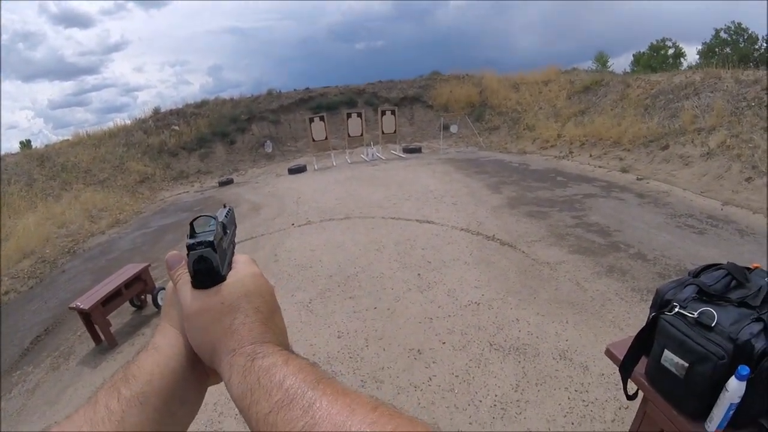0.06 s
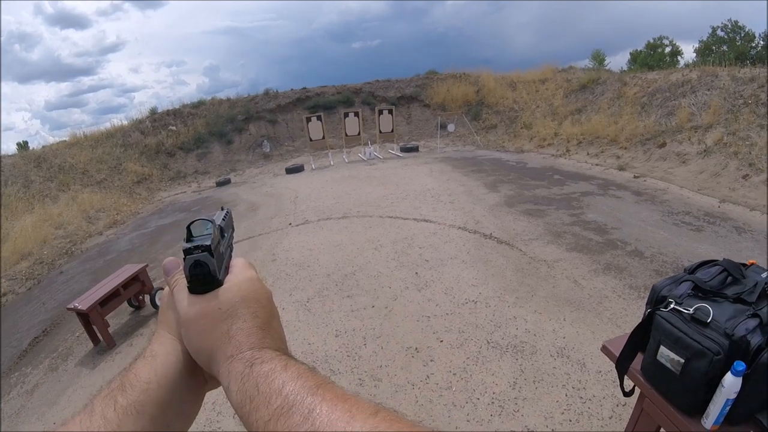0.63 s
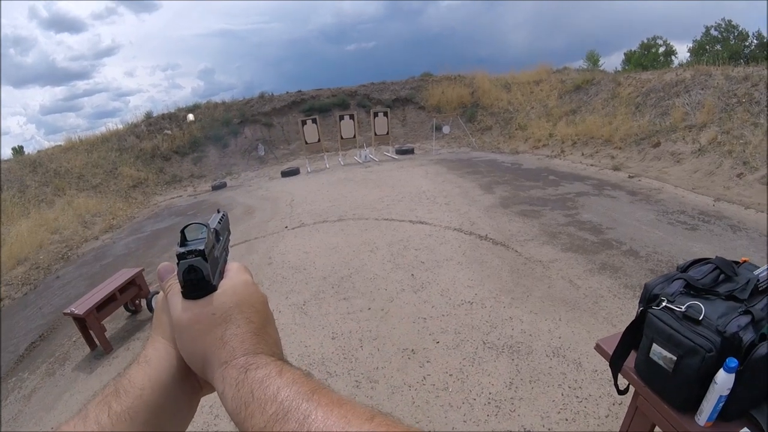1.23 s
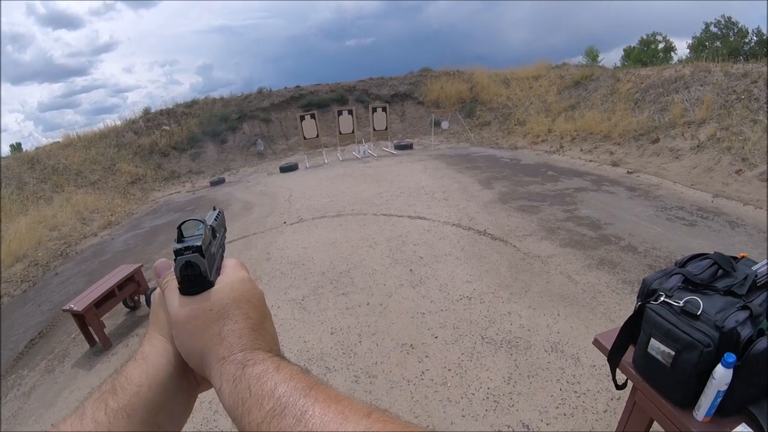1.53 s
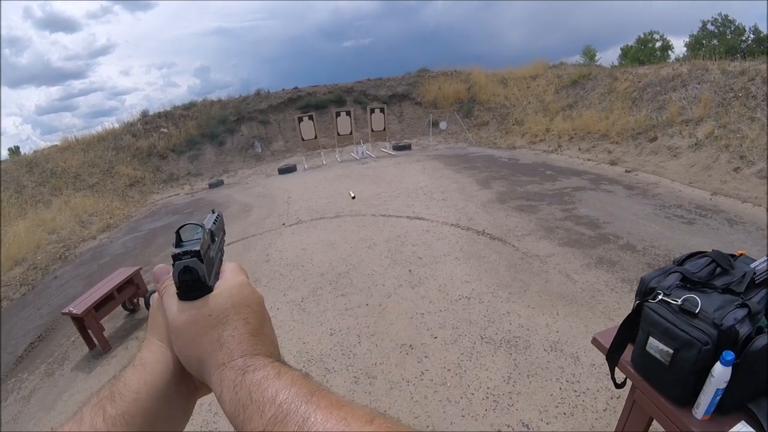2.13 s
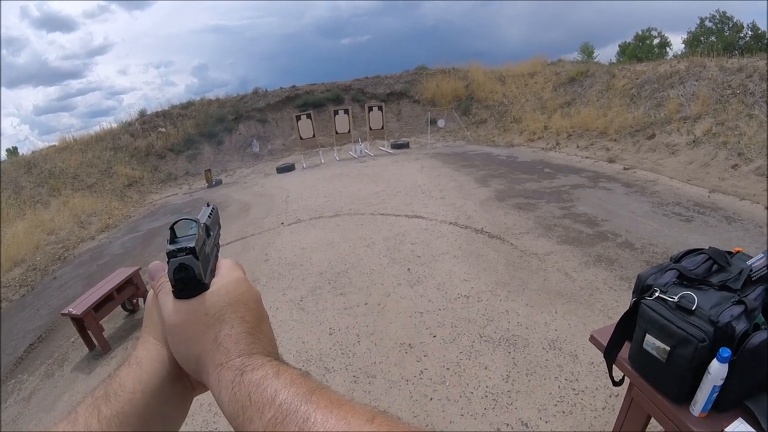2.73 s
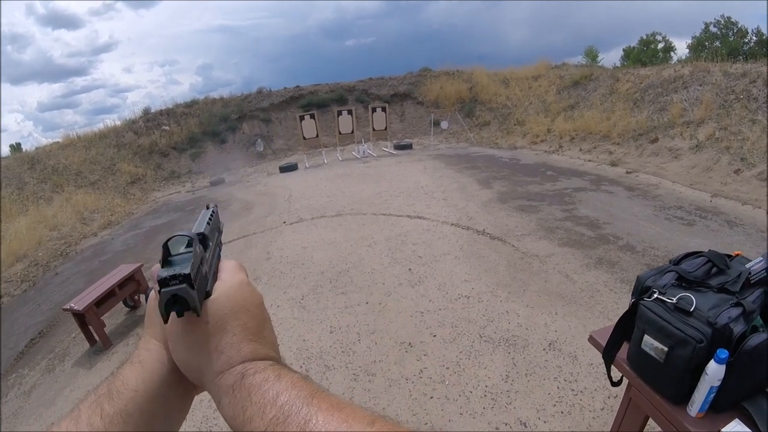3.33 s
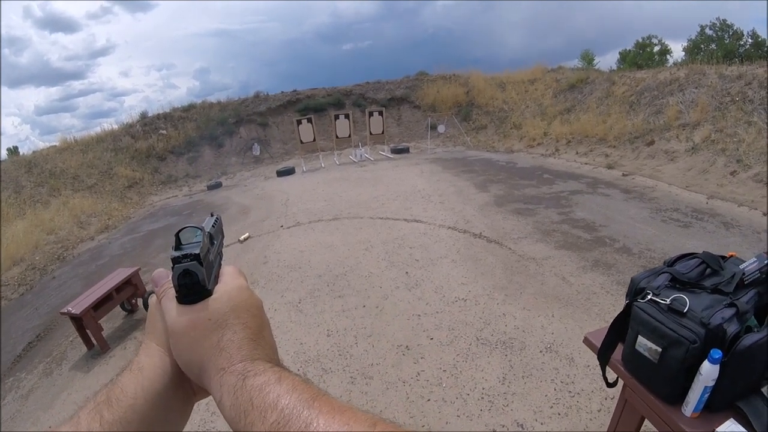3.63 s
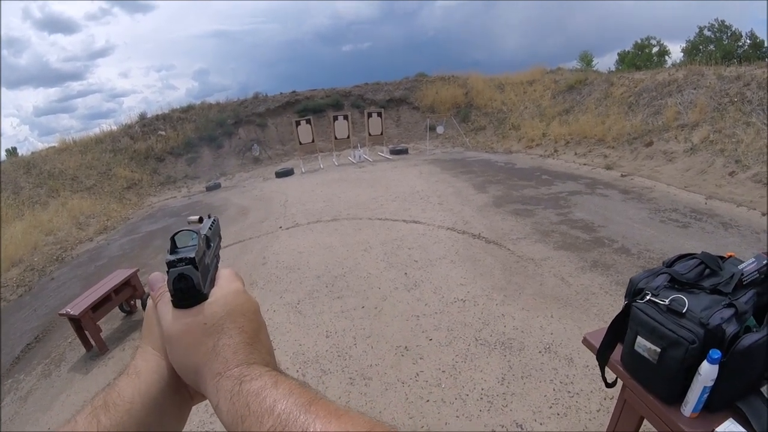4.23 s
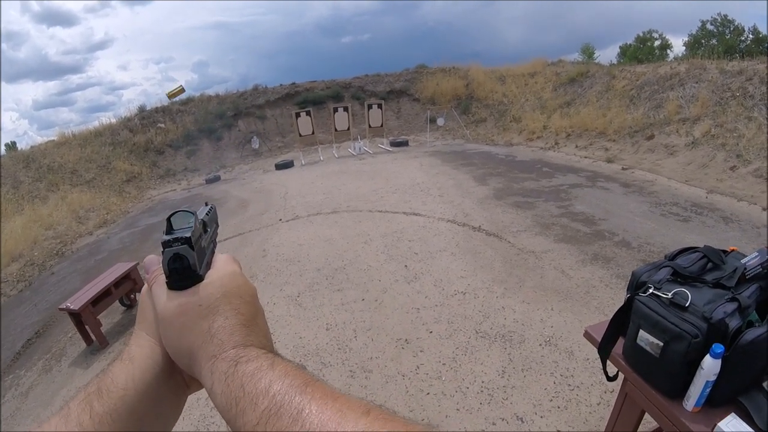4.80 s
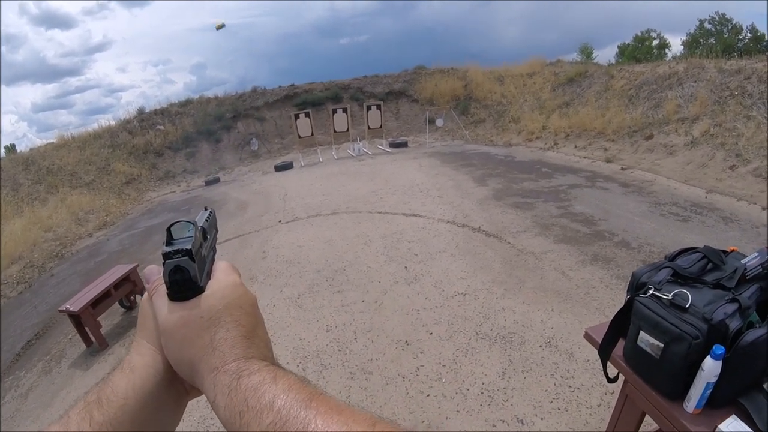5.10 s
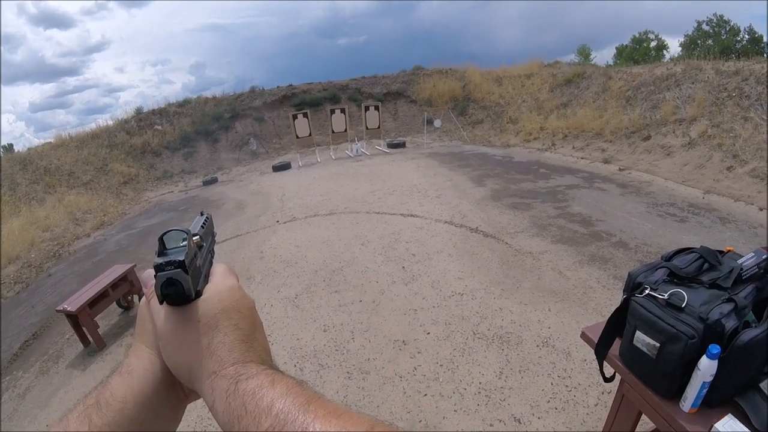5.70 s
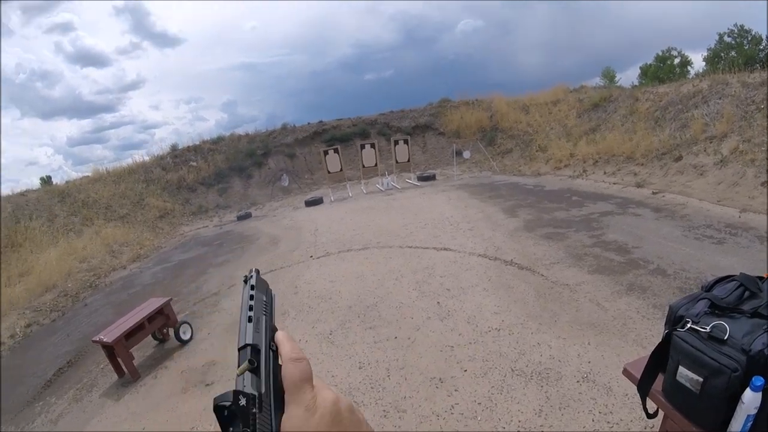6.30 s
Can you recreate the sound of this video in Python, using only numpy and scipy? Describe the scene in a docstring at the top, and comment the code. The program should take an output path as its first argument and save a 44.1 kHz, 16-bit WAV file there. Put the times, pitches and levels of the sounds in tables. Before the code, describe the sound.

Eight steady pistol shots at an outdoor range, each followed at once by the ringing clang of a steel target, in light wind.

```python
"""Pistol shots at a steel plate

Eight shots in an earth-walled range, heard from a camera on the shooter's head in a light wind.
Each blast overloads the microphone, bounces off the ground and scatters from the walls. The bullet
rings a steel plate, which swings back and knocks on its hanger. A limiter (an automatic volume
control) turns the sound down at each shot, then lets the ringing swell up again."""
import sys
import numpy as np
from scipy import signal
from scipy.fft import rfft, irfft
from scipy.io import wavfile
from scipy.ndimage import uniform_filter1d, minimum_filter1d

SR = 44100
rng = np.random.default_rng(int(sys.argv[2]) if len(sys.argv) > 2 else 0)


def wrap_up_sound(samples):
    """Save the sound to the file named by the first command line argument, as 16-bit audio."""
    columns = np.atleast_2d(samples).T
    # keep every value between -1 and 1, then stretch to whole-number steps
    tamed = np.clip(columns, -1, 1)
    steps = np.round(tamed * 32767).astype(np.int16)
    wavfile.write(sys.argv[1], SR, steps)


N = 280299
TIME = np.arange(N) / SR  # seconds since the scene began
AGE = TIME[:SR]  # seconds since one event began
FLIGHT_S = 0.0937  # the bullet flies to the plate and its clang comes back

# The shots: start_s, blast_db, pressure_push_db, wall_echo_db, brightness_db_per_octave
SHOT_LIST = [(0.2816, -6, -7, 0, -0.1), (1.1442, -8, -4, -0.5, 0.9), (1.9326, -7, 5.5, -0.5, -0.7),
             (2.6977, -5.5, -7, -1, -1.5), (3.4407, -4.5, -8, 1.5, -1.1), (4.111, -9, -7, -1.8, 0.8),
             (4.8127, -7.5, -5.5, 1, 0.7), (5.4724, -7, -8, 0, 0.5)]
# The pistol's slide and single echoes after a blast: delay_s, rise_s, decay_s, level_db, pitch_hz, width_hz
AFTER_BLAST = [(.0047, 0.00042, 0.0014, 2.5, 2300, 2200), (0.0123, 0.001, 0.0051, -10, 1340, 1780),
               (0.051, 0.00099, 0.0074, -35, 6000, 5940), (.064, 0.00062, 0.0017, -7.5, 700, 650),
               (.063, 0.0018, 0.003, -18, 2600, 2400), (.081, 0.00092, .002, -32, 2000, 3000),
               (.325, 0.0027, 0.01, -39, 1010, 1200), (.57, 0.016, 0.044, -52, 2600, 1620)]
# Echoes from the earth walls: delay_s, rise_s, hold_s, level_db, fall_db_per_s
WALL_ECHOES = [(0.0, 0.022, 0.12, -34, 90), (0.299, 0.054, 0.09, -51.5, 68)]
# Tone of the blast, its early scatter, the wall echoes and the air: frequency_hz, relative_db
BLAST_TONE = [(100, -13), (700, -8), (1050, -16.5), (1850, 1), (2200, -2.5), (2550, 1), (2950, -6.5),
              (3650, 2.5), (4200, -9.5), (6100, -6.5), (6550, -0.5), (7100, -6.5), (8000, -10),
              (10000, -25.5)]
SCATTER_TONE = [(60, -7.5), (300, -5), (600, 0.5), (1500, -8.5), (3500, -7), (4500, -18), (5800, -18),
                (6400, -13), (7200, -23.5), (11000, -30), (14000, -46)]
WALL_TONE = [(60, -13.5), (300, -0.5), (600, 1.5), (1200, 1.5), (2500, 0.8), (3800, 1), (4700, -13),
             (5800, -10.5), (6400, -4.5), (7200, -25.5), (9000, -36), (14000, -37.5)]
AIR_TONE = [(25, -5), (70, -2), (130, -17.5), (250, -18), (600, -19.5), (1500, -26.5), (3000, -39),
            (5000, -48), (6600, -33.5), (8500, -39.5), (10500, -44), (13000, -45), (15000, -63.5)]
# The plate's modes (ways of vibrating): pitch_hz, level_db, base_ring_s, face_on_share
PLATE_MODES = [(666.9, -42, 0.86, 0.21), (1496, -43.5, 0.74, 0.27), (1807, -39.5, 0.22, 0.92),
               (2156, -45.5, 0.42, 0.58), (3763, -42, 0.43, 0.15), (3973, -37, 0.36, 0.12),
               (247, -58.5, 1.4, 0.4), (1030, -52.5, .45, 1), (1553, -52.5, 0.4, 0.6),
               (1908, -52.5, .35, 0.9), (2128, -56.5, 0.93, 0.3), (2864, -59, 0.78, .3),
               (3290, -45, 0.15, 0.87), (4160, -55, 0.41, 0.43), (4420, -60.5, 0.32, 1),
               (5130, -61, 0.55, 0.93), (5320, -57, 0.33, 1), (5520, -51.5, 0.14, 1),
               (6070, -45.5, 0.11, 0.98), (6217, -62, 0.13, 0.9), (6325, -53, .33, 0.95),
               (6436, -53.5, 0.42, 0.99), (7600, -69, 0.24, 0.8), (7850, -59, 0.27, 0.95),
               (8310, -52.5, 0.26, 0.35), (8430, -58, 0.25, 0.6), (9300, -77, 0.18, 0.9),
               (10120, -85, 0.14, 0.96), (10707, -64.5, 0.25, 1), (11350, -69, 0.2, 1)]
# Still lines of the first six modes, rounded when used: lines_across, lines_down, crest_boost_db
MODE_SHAPES = [(1, 1, 4.5), (1, 2, 9), (2, 1, 6), (0.5, 3, 5), (3.5, 0, 7.5), (3, 3, 8.5)]
# Where each bullet lands: level_db, share_of_width, share_of_height, swing_back_s
BULLET_HITS = [(19.5, 0.34, .08, .87), (18.16, .17, .47, 0.65), (21.8, 0.36, 0.15, .33),
               (19.34, .32, 0.15, 0.49), (18.2, .15, 0.32, 0.5), (15.13, .14, .25, .36),
               (15.16, 0.18, .3, 0.54), (17.7, 0.463, 0.35, 1)]
# The plate knocks on its hanger: start_s, level_db, favoured_pitch_hz
HANGER_KNOCKS = [(0.708, 6, 3864), (1.548, 0, 2636), (2.05, 15, 4530), (2.302, -5, 3723),
                 (2.476, -2.5, 5000), (3.140, -2.5, 5850), (3.900, -7.5, 3980), (4.556, -13, 5820),
                 (5.208, -7.5, 5450), (5.232, -4, 4980), (5.797, -6.5, 3956), (6.046, -7, 6520)]
# The trigger clicks forward after every shot but the last: delay_s
TRIGGER_RESETS = [.2115, .205, .229, .2414, .2423, .234, .2043]
# Clicks of the grip: start_s, level_db, pitch_hz, decay_s
GRIP_CLICKS = [(1.004, -32, 2500, 0.0017), (2.643, -27.5, 6100, 0.0064), (6.312, -44, 3460, 0.003)]
# Gusts of wind: peak_s, half_length_s, boost_db
WIND_GUSTS = [(0.028, 0.27, 7), (0.869, .22, 10.5), (2.5, 0.21, 6.5), (3.199, .25, 9.5), (6.102, 0.3, 13)]
# Dips and lifts in the tone of the whole sound: pitch_hz, width_hz, gain_db
TONE_BANDS = [(1077, 170, -5.5), (7830, 640, 2.5), (10000, 1600, -5.5), (11900, 2400, 2)]


def pistol(scatter_db=-3, bounce_s=0.0073, roughness_db=3.5):
    """Each shot is a blast and a push of air, followed by the slide and by echoes from all around."""
    out = np.zeros(N)
    wall_swell = wall_echo_shape()
    for start_s, blast_db, push_db, wall_db, brightness in SHOT_LIST:
        add(out, start_s, undb(blast_db) * muzzle_blast(brightness))
        add(out, start_s + 0.0008, undb(push_db + 8.5) * pressure_push(rise_s=0.00034, leak_s=0.005))
        add(out, start_s + bounce_s, ground_bounce())
        scatter = colour(burst(rise_s=0.0038, decay_s=0.0079), SCATTER_TONE)
        add(out, start_s, undb(scatter_db) * scatter)
        for delay_s, rise_s, decay_s, db, hz, width_hz in AFTER_BLAST:
            noise = band(burst(rise_s, decay_s)[:SR // 4], hz, width_hz)
            add(out, start_s + delay_s, undb(db) * lowpass(noise, hz + width_hz, order=3))
        # clods and bushes make the wall echo uneven
        rough_noise = undb(roughness_db * wander(250)[:len(AGE)]) * rng.standard_normal(len(AGE))
        add(out, start_s, undb(wall_db) * colour(wall_swell * rough_noise, WALL_TONE))
    return out


def muzzle_blast(db_per_octave, length_s=0.0018, crack_db=33, sizzle_db=-24, edge_db=-18):
    """A shock about two milliseconds long holds all frequencies and rings the camera's shell."""
    spectrum = rfft(rng.standard_normal(len(AGE)) * (AGE < length_s))
    flat_noise = irfft(spectrum / np.abs(spectrum), len(AGE))
    shock = flat_noise * np.exp(-(AGE / (2 * length_s)) ** 4)
    body = colour(shock, [(hz, db + db_per_octave * np.log2(hz)) for hz, db in BLAST_TONE])
    edge = undb(edge_db) * band(shock, 8100, 880)
    sizzle = undb(sizzle_db) * band(shock, 11400, 1000)
    return undb(crack_db) * (body + edge + sizzle)


def pressure_push(rise_s, leak_s):
    """A jump in pressure leaks out of the microphone and dips below zero."""
    return (1 - np.exp(-AGE / rise_s)) * (1 - AGE / leak_s) * np.exp(-AGE / leak_s)


def ground_bounce(centre_s=0.0006, half_s=0.00022, wave_db=13, suction_db=-2):
    """The blast returns from the dirt as a quick push and pull with a longer suction behind it."""
    offset = (AGE - centre_s) / half_s
    wave = -offset * np.exp(-offset ** 2)
    suction = np.interp(AGE - centre_s, AGE, pressure_push(rise_s=0.00043, leak_s=0.0023), left=0)
    return undb(wave_db) * wave - undb(suction_db) * suction


def wall_echo_shape():
    """Each earth wall's echo swells, holds and fades steadily; their powers add."""
    power = 0
    for delay_s, rise_s, hold_s, db, fall_db_per_s in WALL_ECHOES:
        age = np.maximum(AGE - delay_s, 0)
        swell = np.minimum(age / rise_s, 1)
        fade = undb(db - fall_db_per_s * np.maximum(age - hold_s, 0))
        power += (swell * fade) ** 2
    return np.sqrt(power)


def plate_hits(splash_db=-13, spray_db=-30, chance_db=3):
    """Each bullet splashes on the steel plate and sets it ringing and swinging."""
    out = np.zeros(N)
    waves = mode_waves(damping=0.97)
    # where the bullet lands sets the main modes; chance varies the minor ones
    minor = np.arange(len(PLATE_MODES)) >= len(MODE_SHAPES)
    for (shot_s, *_), (db, across, down, swing_s) in zip(SHOT_LIST, BULLET_HITS):
        spot_db = np.pad(strike_spot_db(across, down), (0, minor.sum()))
        clang = ring(waves * plate_swing(swing_s), spot_db, chance_db * minor)
        add(out, shot_s + FLIGHT_S, undb(db) * clang)
        splash = undb(splash_db) * burst(rise_s=0.000067, decay_s=0.0006)
        spray = undb(spray_db) * burst(rise_s=0.0015, decay_s=0.026)
        add(out, shot_s + FLIGHT_S, lowpass(band(splash + spray, 4000, 5000), 5400, order=3))
    return out


def mode_waves(damping):
    """Each mode is a pure tone that fades by 60 dB in base_ring_s / damping seconds."""
    hz, _, base_ring_s, _ = np.transpose(PLATE_MODES)[:, :, None]
    return np.exp(-np.log(1000) * damping * AGE / base_ring_s) * np.sin(2 * np.pi * hz * AGE)


def strike_spot_db(across, down):
    """A mode rings most when hit on a crest, where it moves most, and hardly at all on a still line."""
    lines_across, lines_down, crest_db = np.transpose(MODE_SHAPES)
    motion = np.cos(np.pi * np.round(lines_across) * across) * np.cos(np.pi * np.round(lines_down) * down)
    return crest_db + 20 * np.log10(np.hypot(motion, undb(-25)))  # a little is always left


def plate_swing(swing_back_s, settle_s=0.69, beam_hz=2600):
    """Each mode's beam of sound turns toward the shooter as the plate tips; high modes beam narrowly."""
    hz, _, _, face_on = np.transpose(PLATE_MODES)[:, :, None]
    tilt = np.abs(np.sin(np.pi * AGE / swing_back_s)) * np.exp(-AGE / settle_s)
    return face_on + (1 - face_on) * np.tanh(2.6 * tilt * (1 + hz / beam_hz)) ** 2


def ring(waves, extra_db, chance_db):
    """A blow mixes the plate's modes, never twice in just the same way."""
    count = len(PLATE_MODES)
    db = np.transpose(PLATE_MODES)[1] + extra_db + chance_db * rng.standard_normal(count)
    return (undb(db) * rng.choice([-1, 1], count)) @ waves


def hanger_knocks(focus_db=4, hook_db=-45, hook_hz=6320):
    """Light knocks on the hanger ring the plate's upper modes and the hook itself."""
    out = np.zeros(N)
    hz, _, _, face_on = np.transpose(PLATE_MODES)
    waves = mode_waves(damping=1.56)  # touching the hanger shortens the ring
    facing_db = 10 * np.log10(face_on)  # the plate is nearly face-on when it knocks
    for start_s, db, favoured_hz in HANGER_KNOCKS:
        plate = ring(waves, facing_db - focus_db * np.log2(hz / favoured_hz) ** 2, chance_db=4.5)
        hook = undb(hook_db) * band(burst(rise_s=0.0033, decay_s=0.025), hook_hz, 46)
        add(out, start_s, undb(db) * (plate + hook))
    return out


def plate_shimmer(count=70, low_hz=2500, high_hz=13000, longest_ring_s=0.43, db_per_octave=-5):
    """Each bullet also wakes a new mix of weak high modes; the highest die away first."""
    out, age = np.zeros(N), AGE[:SR // 4]
    hz = rng.uniform(low_hz, high_hz, (count, 1))
    fade = np.exp(-np.log(1000) * age / longest_ring_s * np.sqrt(hz / low_hz))
    waves = undb(db_per_octave * np.log2(hz / low_hz)) * fade * np.sin(2 * np.pi * hz * age)
    for (shot_s, *_), (db, *_) in zip(SHOT_LIST, BULLET_HITS):
        add(out, shot_s + FLIGHT_S, undb(db - 60) * (rng.standard_normal(count) @ waves))
    return out


def handling(lower_s=6.19, rub_db=-56):
    """The trigger and grip click, and the hands rub as the pistol is lowered."""
    out = np.zeros(N)
    for (shot_s, *_), delay_s in zip(SHOT_LIST, TRIGGER_RESETS):
        add(out, shot_s + delay_s, click(db=-22.5, hz=5990, decay_s=0.0022))
    for start_s, db, hz, decay_s in GRIP_CLICKS:
        add(out, start_s, click(db, hz, decay_s))
    rub = band(burst(rise_s=0.064, decay_s=0.31), 3500, 1200)
    add(out, lower_s, undb(rub_db) * lowpass(rub, 4140, order=4))
    return out


def click(db, hz, decay_s):
    """A small contact on the pistol makes a tiny burst of noise."""
    return undb(db) * lowpass(band(burst(decay_s / 2, decay_s), hz, 0.82 * hz), 5530, order=3)


def spent_case(start_s=2.1797, level_db=-5.5, tick_db=-15, clack_db=-14):
    """One empty cartridge case strikes the camera with a thump, a tick and a clack."""
    out = np.zeros(N)
    contact = burst(rise_s=0.0001, decay_s=0.00043)
    shell = undb(tick_db) * band(contact, 5400, 3400) + undb(clack_db) * band(contact, 600, 600)
    thump = pressure_push(rise_s=0.00005, leak_s=0.005)
    add(out, start_s, undb(level_db) * (thump + shell))
    return out


def air_and_wind(air_db=-54, breeze_db=-58, flutter_db=3.8, wind_hz=60):
    """The air hisses softly while a breeze flutters on the microphone and swells in gusts."""
    air = undb(air_db + 0.64 * wander(7.2)) * colour(rng.standard_normal(N), AIR_TONE)
    rumble = lowpass(band(rng.standard_normal(N), wind_hz, 55), 83)
    gusts_db = sum(db * np.exp(-((TIME - peak_s) / half_s) ** 2) for peak_s, half_s, db in WIND_GUSTS)
    return air + rumble * undb(breeze_db + gusts_db + flutter_db * wander(13))


def overall_tone(sound):
    """The whole sound dips near 1 and 10 kHz and lifts near 8 and 12 kHz."""
    for hz, width_hz, db in TONE_BANDS:
        in_band = signal.lfilter(*signal.iirpeak(hz, hz / width_hz, fs=SR), sound)
        sound = sound + (undb(db) - 1) * in_band
    return sound


def limiter(sound, ceiling_db=-6, ahead_s=0.0525, hold_s=0.14, slow_share=0.69):
    """Turns the volume down just before a loud peak, holds it, then lets go: first fast, then slowly."""
    over_db = 20 * np.log10(np.maximum(np.abs(sound) / undb(ceiling_db), 1))
    held_db = -minimum_filter1d(-over_db, int((ahead_s + hold_s) * SR))
    held_db = np.interp(TIME - (hold_s - ahead_s) / 2, TIME, held_db)
    cut_db = np.maximum(recover(held_db, db_per_s=55), recover(slow_share * held_db, db_per_s=2.5))
    return sound * undb(-uniform_filter1d(cut_db, int(0.0037 * SR)))


def recover(cut_db, db_per_s):
    """A volume cut that starts at once and eases off at a steady rate."""
    return np.maximum.accumulate(cut_db + db_per_s * TIME) - db_per_s * TIME


def undb(db):
    """Turns decibels into a number to multiply by."""
    return 10 ** (np.asarray(db) / 20)


def add(track, start_s, sound):
    """Mixes a sound into the track at start_s."""
    i = max(int(round(start_s * SR)), 0)
    track[i:i + len(sound)] += sound[:max(N - i, 0)]


def burst(rise_s, decay_s):
    """Noise that swells and dies away."""
    return rng.standard_normal(len(AGE)) * (1 - np.exp(-(AGE / rise_s) ** 2)) * np.exp(-AGE / decay_s)


def wander(rate_hz):
    """A random drift, mostly between -1 and 1."""
    step = int(SR / rate_hz)
    return uniform_filter1d(np.repeat(rng.standard_normal(N // step + 1), step), step)[:N]


def colour(sound, tone, size=4096):
    """Shapes a sound with a tone table; white noise keeps its power."""
    hz, db = np.transpose(tone)
    log_hz = np.log(np.fft.rfftfreq(size, 1 / SR) + 1)
    log_gain = np.log(undb(np.interp(log_hz, np.log(hz), db)))
    # build the filter so that it rings only after a sound, never before
    cepstrum = irfft(log_gain)[:size // 2]
    response = irfft(np.exp(rfft(np.r_[0, 2 * cepstrum[1:]], size)))
    return signal.fftconvolve(sound, response / np.linalg.norm(response))[:len(sound)]


def band(sound, hz, width_hz):
    """Favours the pitches around hz; white noise keeps its power."""
    b, a = signal.iirpeak(hz, hz / width_hz, fs=SR)
    return signal.lfilter(b, a, sound) / np.sqrt(b[0])


def lowpass(sound, hz, order=2):
    """Softens everything above hz."""
    return signal.sosfilt(signal.butter(order, hz, fs=SR, output="sos"), sound)


def scene():
    """Everything that reaches the one microphone."""
    shooting = pistol() + plate_hits() + hanger_knocks() + plate_shimmer()
    return (shooting + handling() + spent_case() + air_and_wind())[None]


def record(dry, overload_db=15, top_hz=14600):
    """The microphone overloads, the tone is shaped, the limiter acts and the highest treble is cut."""
    squashed = undb(overload_db) * np.tanh(dry[0] / undb(overload_db))
    limited = limiter(overall_tone(lowpass(squashed, 10760, order=5)))
    return signal.sosfilt(signal.ellip(8, 0.2, 70, top_hz, fs=SR, output="sos"), limited)[None]


dry = scene()
out = record(dry)
wrap_up_sound(out)
```